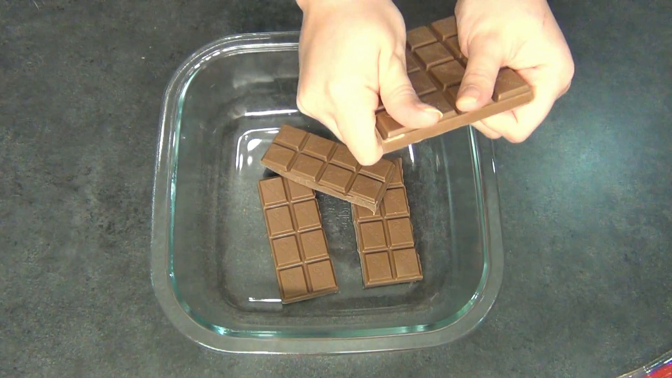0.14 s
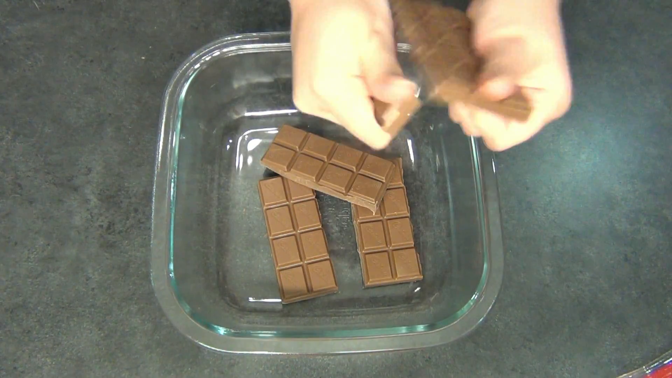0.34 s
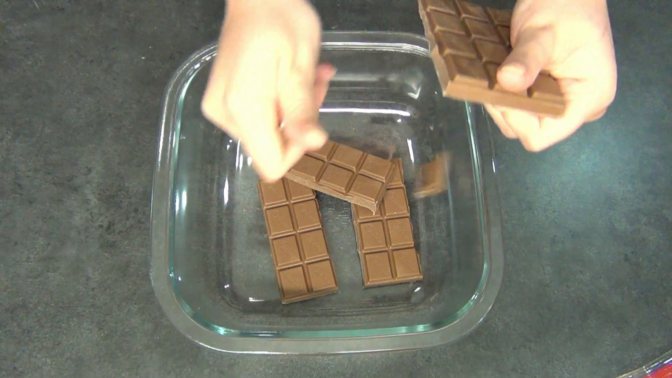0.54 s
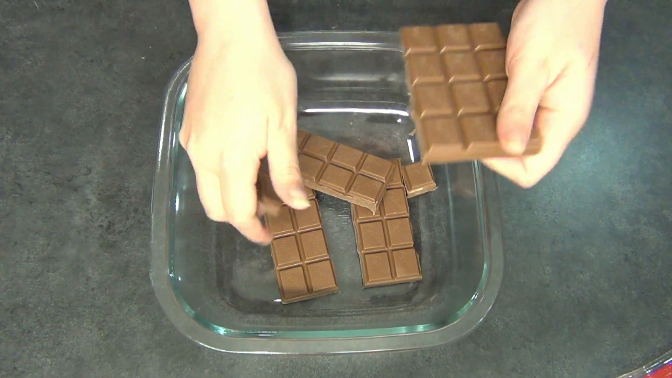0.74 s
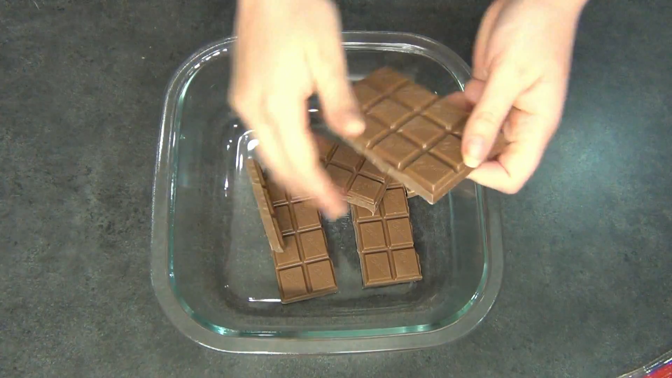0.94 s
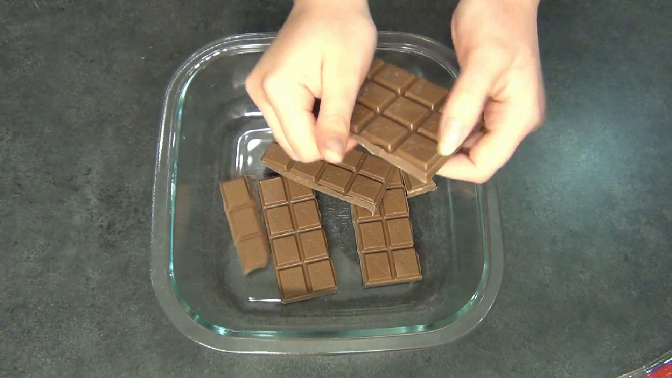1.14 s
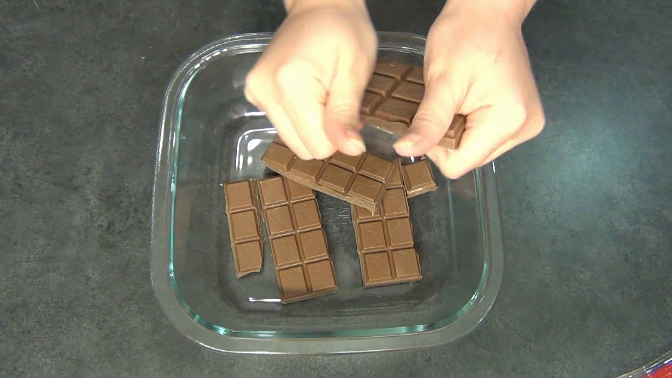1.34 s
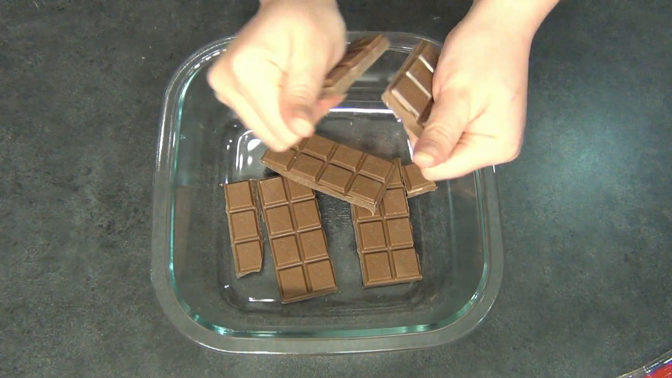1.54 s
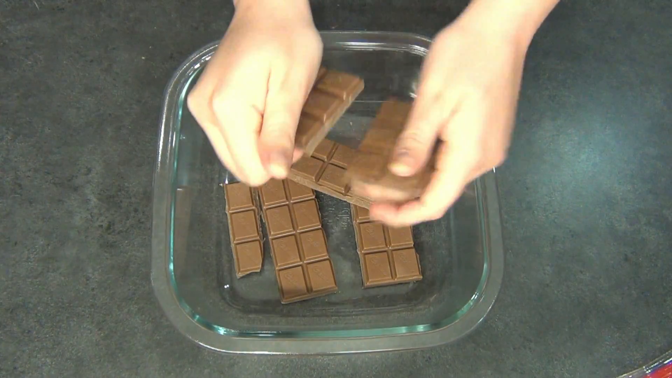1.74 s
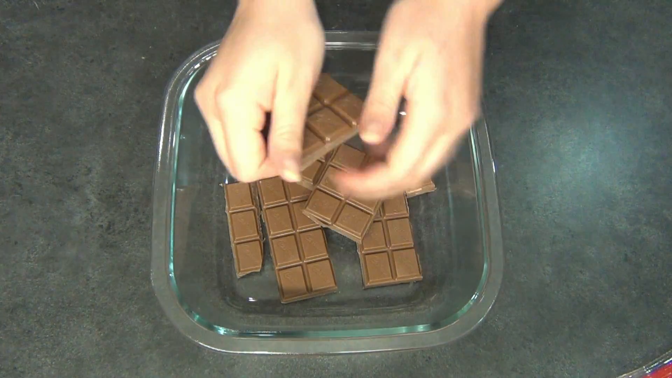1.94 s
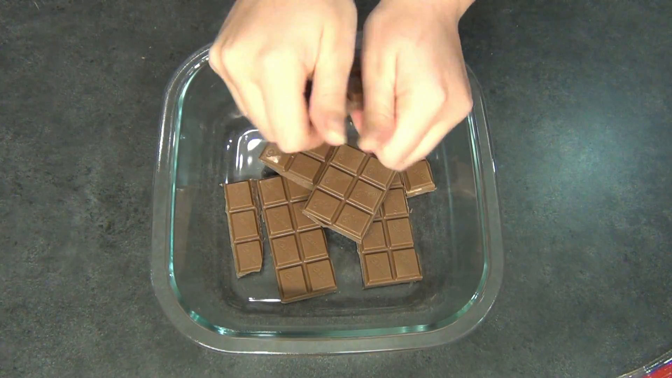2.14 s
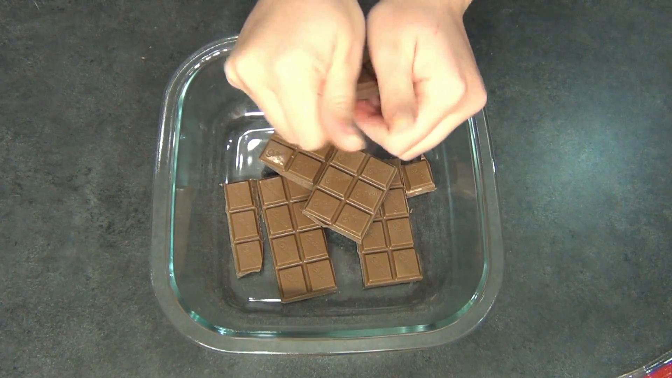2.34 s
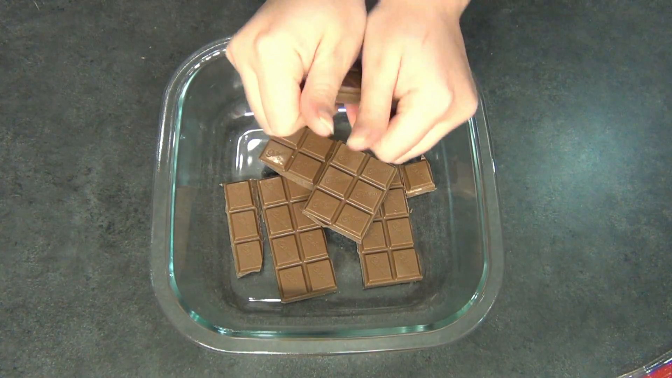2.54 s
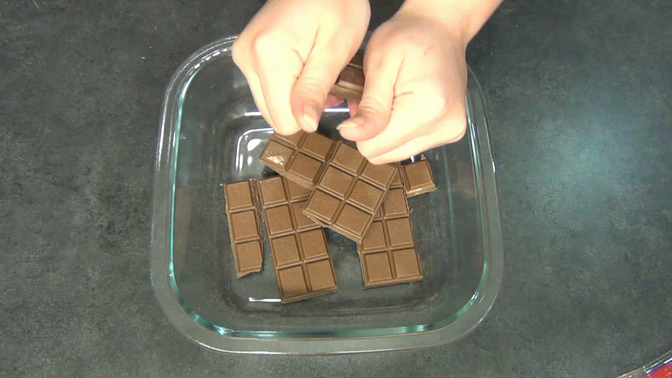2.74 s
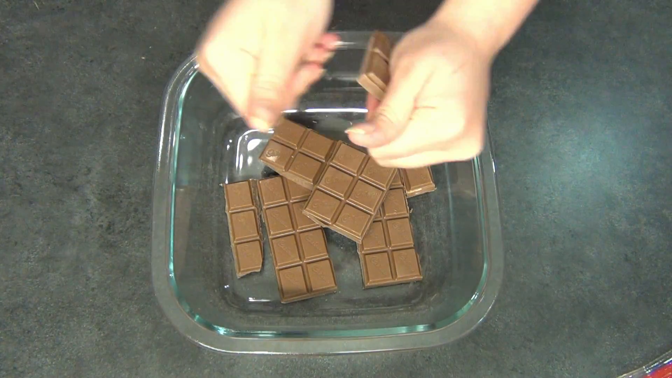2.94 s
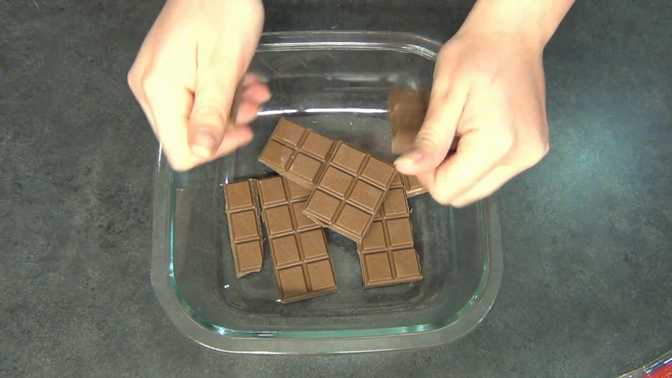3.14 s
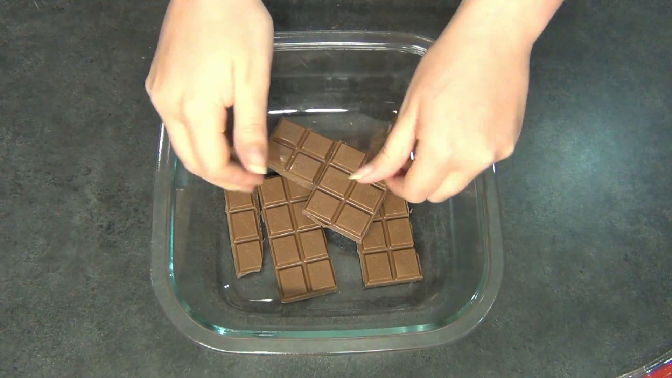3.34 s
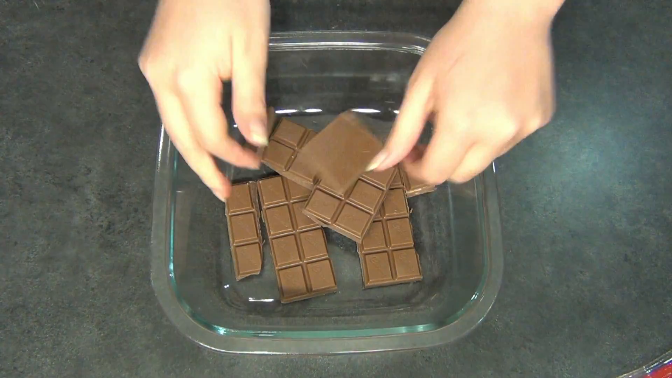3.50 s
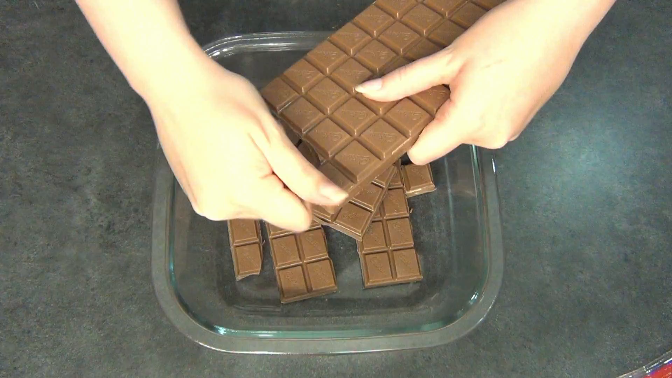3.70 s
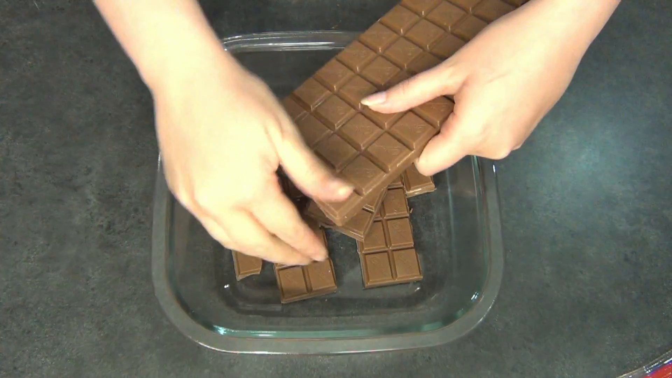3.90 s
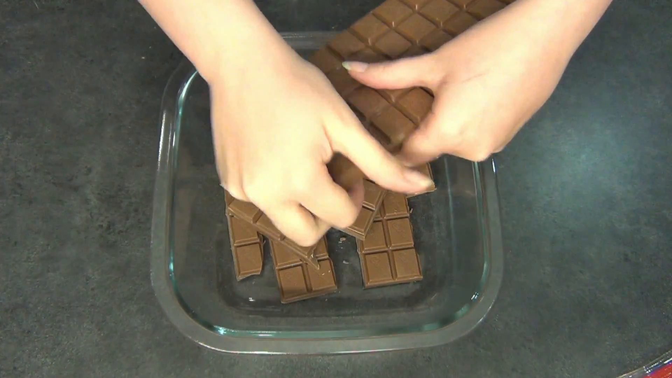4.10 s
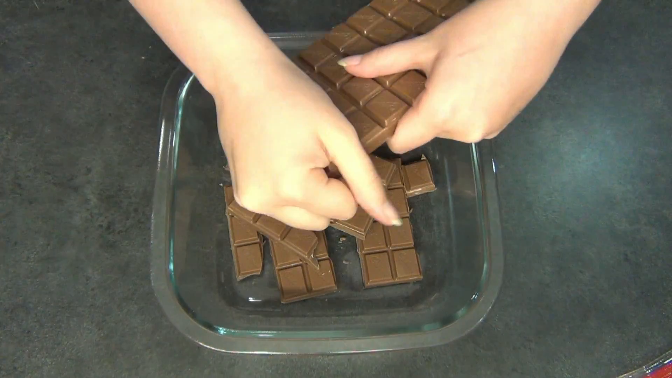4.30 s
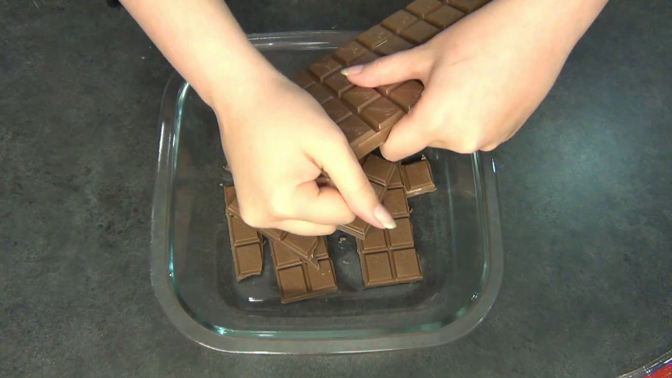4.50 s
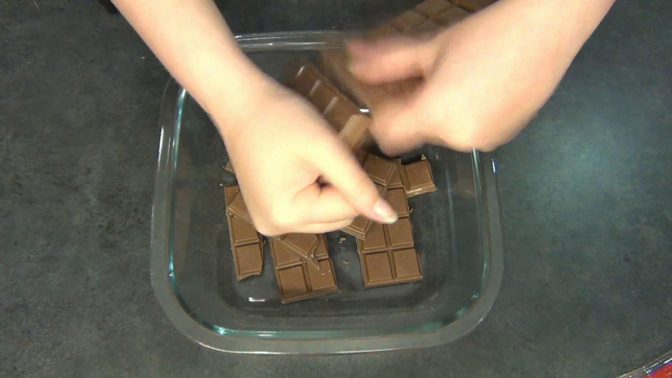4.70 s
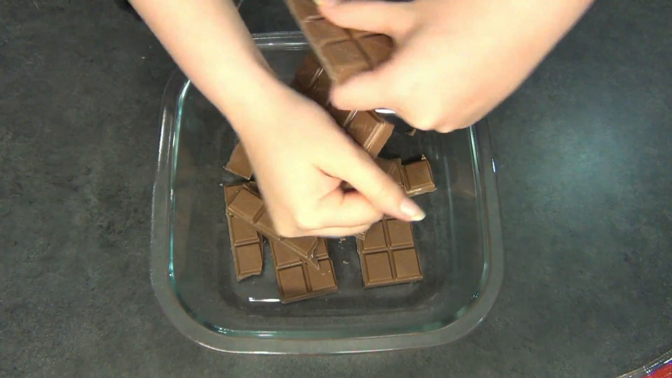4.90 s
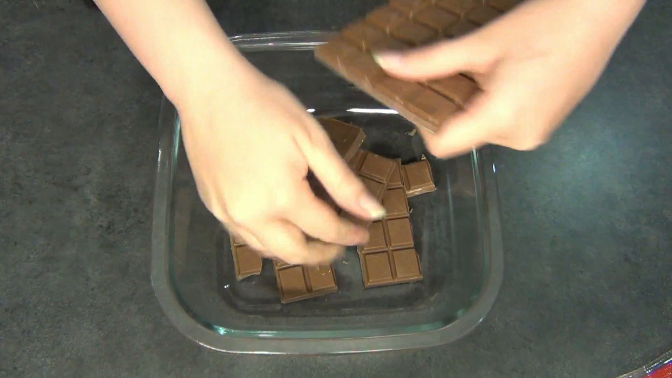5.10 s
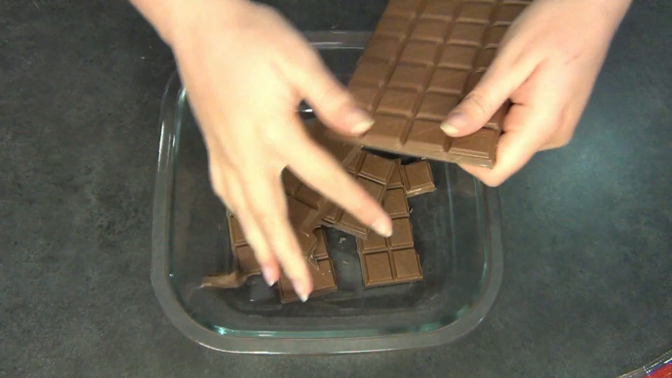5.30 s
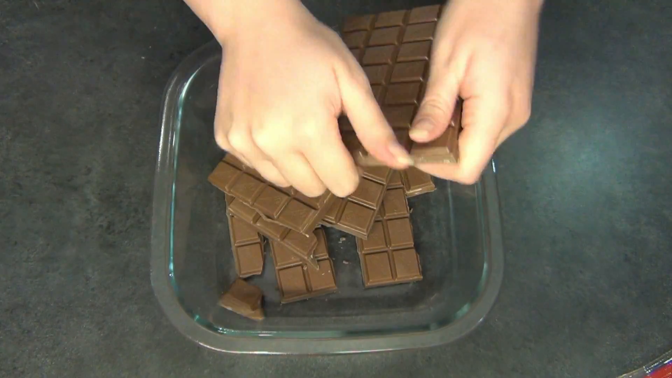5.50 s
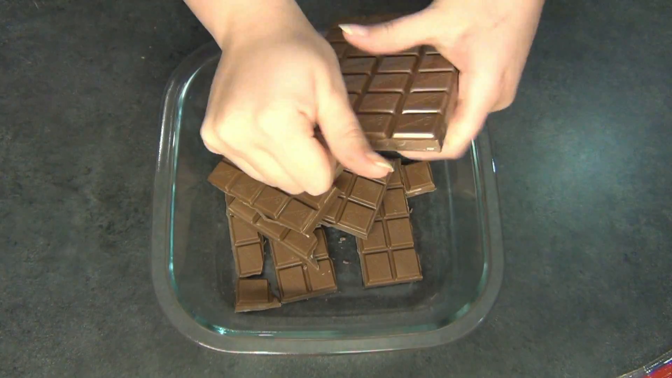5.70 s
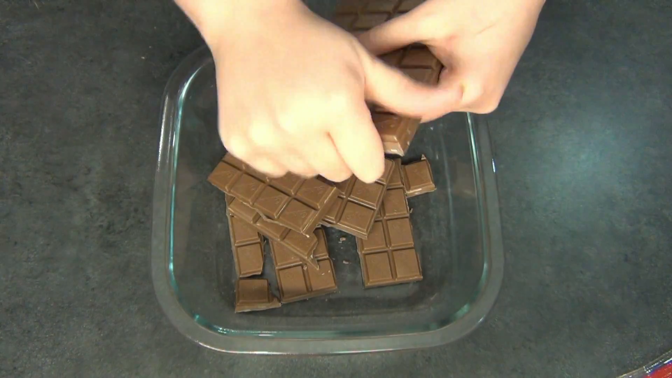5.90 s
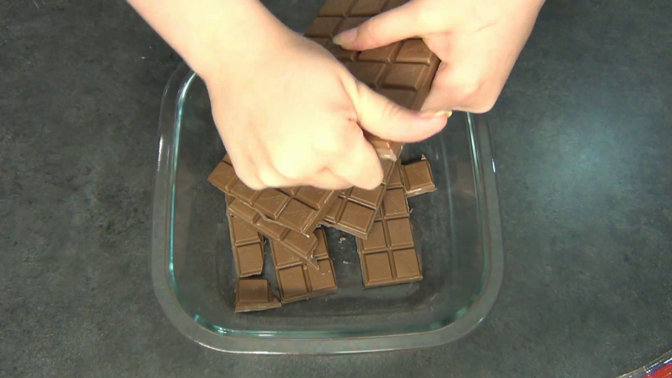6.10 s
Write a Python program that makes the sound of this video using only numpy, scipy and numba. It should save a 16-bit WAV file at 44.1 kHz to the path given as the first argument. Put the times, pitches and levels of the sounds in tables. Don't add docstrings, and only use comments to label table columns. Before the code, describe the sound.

Close above a glass dish on a kitchen counter, a chocolate bar is snapped by hand with loud, dry, irregular cracks. After most breaks the pieces drop in uneven flurries of clacks, with brief glassy rings and small counter thumps. Hard walls give a lively tail that swells after peaks flattened by the camera microphone. Soft finger rubs and faint hum and room tone lie beneath; one echo is cut off past the middle.

```python
import sys
import numpy as np
from scipy import signal
from scipy.fft import rfft, irfft
from scipy.io import wavfile
from scipy.ndimage import uniform_filter1d, minimum_filter1d
from numba import njit

SR = 44100
rng = np.random.default_rng(int(sys.argv[2]) if len(sys.argv) > 2 else 0)


def elevation(decibels):
    levels = np.asarray(decibels, float)
    return 10 ** (levels / 20)


def transcribe(signal):
    frames = np.atleast_2d(signal).T
    limited = np.clip(frames, -1, 1)
    pcm = np.round(limited * 32767).astype(np.int16)
    wavfile.write(sys.argv[1], SR, pcm)


N = 271215
CUT_S = 3.7595
GAP = 44100
LONG = N + GAP
SIDES = np.array([[1], [-1]])


def place(s):
    return int(s * SR) + GAP * (s > CUT_S)


def burst(rise_s, fall_s, body_hz, body_q, treble_db, edge_hz, low_hz):
    t = np.arange(1024) / SR
    f = np.fft.rfftfreq(1024, 1 / SR) + 1
    swell = (t / rise_s) ** 1.135 / (1 + (t / rise_s) ** 0.98)
    grit = rng.standard_normal(len(t)) * swell * np.exp(-t / fall_s)
    click = (t == 0) * np.linalg.norm(grit)
    body = 1 / (1 + (body_q * (f / body_hz - body_hz / f)) ** 2) ** 1.75
    edge = elevation(2 * treble_db) / (1 + (edge_hz / f) ** 2)
    power = (body + edge) / (1 + (low_hz / f) ** 4)
    cepstrum = irfft(np.log(power) / 2)
    forward = np.r_[1, np.full(511, 2.), 1, np.zeros(511)]
    colour = np.exp(rfft(cepstrum * forward))
    out = irfft(rfft([grit, click]) * colour)
    return out / np.abs(out[0]).max()


def snaps():
    # (time [s], peak [dB], bar resonance [Hz], sharpness Q [-], treble [dB])
    breaks = [
        (.39, 8.5, 1610, 2.7, -2),
        (0.4528, -13.5, 2880, 8.5, -14),
        (1.513, 1, 1055, 0.51, -2),
        (2.9419, -2.5, 2420, 2.2, -13.5),
        (4.413, 3.5, 1350, 1.4, 5.5),
        (4.7885, 8.5, 1320, 3.9, -6),
    ]
    out = np.zeros((2, LONG))
    for s, db, hz, q, treble_db in breaks:
        crack = burst(0.0017, 0.0011, hz, q, treble_db, edge_hz=1830, low_hz=0.22 * hz)
        out[:, place(s):][:, :1024] += elevation(db) * crack
    return out


def ring(modes, s, db, scatter_db, push, pitch_hz=None):
    spot = rng.standard_normal((len(s), len(modes)))
    starts = [place(t) for t in s]
    out = np.zeros(LONG)
    for k, (hz, mode_db, t60) in enumerate(modes):
        off_db = 0 if pitch_hz is None else -7 * np.abs(np.log2(hz / pitch_hz))
        blows = np.zeros(LONG)
        blows[starts] = elevation(db + mode_db + off_db + scatter_db * spot[:, k])
        pole = np.exp(2j * np.pi * hz / SR - np.log(1000) / (t60 * SR))
        out += signal.lfilter([1], [1, -pole], blows).imag
    contact = np.hanning(push)
    return np.convolve(out, contact / contact.sum())[:LONG]


def landings():
    # (time [s], peak [dB], contact pitch [Hz], counter thump [dB], sharpness [dB])
    corners = [(.6257, -1.5, 4500, -34, .1), (0.66, -10, 3950, -43, -11), (0.9106, -10, 4070, -22.5, -5),
               (1.2445, -2.5, 2740, -25.5, -8.5), (1.9129, -10.5, 4000, -23, -5),
               (1.937, 9.5, 4700, -16.5, 4), (1.9597, -0.5, 4580, -39, -12),
               (1.9618, -23, 3030, -25.5, -41), (3.5327, -21, 3000, -32, 5), (3.5516, -4, 3100, -38, -0.5),
               (3.607, -20.5, 5000, -40, 12), (3.608, -3.5, 5570, -25.5, -10),
               (3.6257, -13, 4100, -43, -12), (3.961, -15.5, 2830, -22, 5), (4.0319, -4, 3950, -25.5, 0),
               (5.212, -9, 2970, -16, -4), (5.2331, -9.5, 4000, -30, -11), (5.3752, -3.5, 4750, -23, 3)]
    # (time [s], peak [dB], contact pitch [Hz], counter thump [dB], hollowness [dB])
    faces = [(0.6174, -15, 2500, -54, -4.5), (0.8848, -16.5, 2850, -32.5, -3),
             (0.9042, -13, 3980, -34, 1.5), (0.915, 2, 2850, -24.5, -11.5), (1.0079, -3, 3450, -22.5, -15),
             (1.9085, -16.5, 3200, -20, 3.5), (1.9176, -10, 2960, -45, -26),
             (1.972, -6.5, 4160, -19.5, -10), (3.4698, -17, 2820, -20, -0.5), (3.505, -14, 2950, -30, -1),
             (3.5843, -20.5, 3030, -51, -3), (3.5909, -14, 2300, -33, -3),
             (3.6327, -11.5, 3100, -31.5, -3.5), (3.6494, -13.5, 2800, -26.5, -8),
             (3.9771, -14, 2950, -20, 0.5), (3.9937, -10.5, 4130, -59, -7), (5.1751, -15, 2920, -22, -9),
             (5.1903, -15.5, 3700, -33, 4), (5.3992, -15, 3900, -22.5, -0.5)]
    # (time [s], peak [dB], counter thump [dB])
    settles = [(0.6712, -34, -36), (0.8697, -38, -38), (1.0754, -29, -30.5), (1.1483, -41, -34),
               (1.2812, -22.5, -26), (3.4865, -36, -39), (3.5237, -36, -52), (3.7316, -22.5, -29),
               (5.4341, -22.5, -24.5), (5.4997, -32, -23.5), (5.5615, -35, -41.5)]
    # (treble [dB], hollow knock [dB], share of the peak dB that the knock follows [-])
    contacts = [
        (-12, -26, 0.83),
        (-46, -15, 0.79),
        (-27, -20.5, 0.9),
    ]
    settle_hz = 2950
    kinds = (
        [(*row, 0) for row in corners],
        [(*row[:4], 0, row[4]) for row in faces],
        [(s, db, settle_hz, thump_db, 0, 0) for s, db, thump_db in settles])
    out = []
    for rows, (treble_db, knock_db, follow) in zip(kinds, contacts):
        for s, db, hz, thump_db, sharp_db, hollow_db in rows:
            knock = knock_db + follow * db + hollow_db
            out.append((s, db, hz, thump_db, treble_db + sharp_db, knock))
    return np.transpose(out)


def drops():
    # (frequency [Hz], level [dB], t60 [s])
    floor_modes = [(2370, -7, .025), (2870, -2, .025), (3350, -6, .015), (3930, -3, .025), (4500, -7, .015),
                   (5050, -8, .015), (5750, -9, .015)]
    # (frequency [Hz], level [dB], t60 [s])
    hollow_modes = [(1550, -6.5, 0.035), (1575, -2, 0.044), (1620, -2, 0.034), (1798, -10, 0.071)]
    # (frequency [Hz], level [dB], t60 [s])
    counter_modes = [(96, -3, .35), (170, -6, .06), (197, -1, .05), (226, 0, .045), (265, -3, .04),
                     (320, -9, .04), (400, -8, .04), (485, -8, .05), (615, -6, .05), (760, -9, .03)]
    spot_db = 2.5
    s, db, pitch_hz, thump_db, treble_db, knock_db = landings()
    tick = np.zeros((2, LONG))
    for k in range(len(s)):
        hit = burst(0.00005, 0.0018, pitch_hz[k], 1.6, treble_db[k], edge_hz=1000, low_hz=1350)
        tick[:, place(s[k]):][:, :1024] += elevation(db[k] + 4.0) * hit
    clack = ring(floor_modes, s, db - 8.0, spot_db, push=5.7, pitch_hz=pitch_hz)
    knock = ring(hollow_modes, s, knock_db + 8.0, spot_db, push=10.4)
    thump = ring(counter_modes, s, thump_db + 3.5, spot_db, push=68.0)
    return tick + clack + knock, thump


def glass():
    # (time [s], ring [dB], long-wall tone [dB], thin-rim tones [dB], favoured pitch [Hz])
    clinks = [(0.6201, -35, -42, -52, 2000), (.6265, -15, -21, -35.5, 4240), (.657, -44, -61, -46, 3950),
              (0.905, -19, -43, -41, 2940), (0.915, -25, -43, -32, 3180), (1.008, -30.5, -48, -43, 3330),
              (1.245, -29.5, -42.5, -36, 2950), (1.907, -37, -57, -36, 1600), (1.964, -36, -48, -46, 4400),
              (3.505, -33.5, -57, -52, 2900), (3.633, -31.5, -39.5, -49, 2300),
              (3.96, -46, -44, -44.5, 2000), (4.032, -33.5, -40.5, -30.5, 3600),
              (5.191, -37, -36.5, -59, 1600), (5.211, -39, -44, -36.5, 2940),
              (5.374, -39.5, -32.5, -25, 2980), (5.433, -46, -36, -46, 2870), (5.5, -65, -34.5, -70, 2810)]
    # (frequency [Hz], level [dB], t60 [s])
    body_modes = [(1525, -7, .15), (1585, -8, .2), (2366, -6, .25), (2835, -6, .15), (2865, -3, .6),
                  (3010, -13, .2), (3905, -5, .15), (3942, -7, .25), (3970, -3, .2), (4505, -9, .25),
                  (5050, -5, .3), (5435, -7, .22), (5690, -9, .18), (6150, -13, .2)]
    # (frequency [Hz], level [dB], t60 [s])
    rim_modes = [(6621, -3, .15), (7515, -4, .15), (8285, -5, .15), (8700, 0, .14), (9800, -3, .15),
                 (10350, -3, .14), (11050, -6, .12), (11850, -3, .13)]
    # (frequency [Hz], level [dB], t60 [s])
    wall_modes = [(839.5, 0, .5)]
    spot_db = 1.5
    s, ring_db, wall_db, rim_db, pitch_hz = np.transpose(clinks)
    body = ring(body_modes, s, ring_db, spot_db, push=3.1, pitch_hz=pitch_hz)
    flash_modes = [(hz, db, 0.13 * t60) for hz, db, t60 in body_modes[2:] + rim_modes[:5]]
    flash = ring(flash_modes, s, rim_db + 13.5, 2 * spot_db, push=3)
    wall = ring(wall_modes, s, wall_db, 0, push=14.0) * elevation([[0], [-1.5]])
    rim = ring(rim_modes, s, rim_db - 5, spot_db, push=3)
    return body + flash + wall + rim


def rubs():
    # (time [s], peak [dB], length [s], centre [Hz])
    slides = [(.0, -39.5, 0.24, 1430), (0.158, -53, 0.036, 9000), (1.02, -37, 0.003, 10500),
              (1.071, -38, 0.0018, 11000), (1.11, -44, 0.0022, 9000), (1.151, -39, 0.0018, 12000),
              (1.225, -42, 0.0022, 10000), (2.164, -34, 0.0026, 11000), (2.539, -53, 0.018, 9200),
              (2.624, -51.5, 0.088, 13000), (3.947, -46, .004, 7000), (4.211, -42.5, 0.017, 9850),
              (5.0, -55, 0.016, 5200), (5.785, -47.5, 0.038, 11100), (5.88, -49.5, .035, 9250),
              (6, -61, .012, 7860), (6.038, -45, 0.029, 8750)]
    out = np.zeros(N)
    t = np.arange(N) / SR
    for s, db, length, hz in slides:
        near = slice(max(int((s - length) * SR), 0), int((s + length) * SR))
        noise = rng.standard_normal(len(t[near]))
        swish = signal.lfilter(*signal.iirpeak(hz, 1.4, fs=SR), noise)
        out[near] += elevation(db) * swish * np.exp(-((t[near] - s) / (length / 1.65)) ** 2)
    return out


def read_curve(rows, hz):
    f, *cols = np.transpose(rows)
    return [np.interp(np.log(hz + 1), np.log(f), c) for c in cols]


def kitchen(x):
    # (frequency [Hz], t60 [s], level [dB])
    decay = [(106, 0.8, -7), (234, 0.51, 17.5), (635, 0.9, 7.5), (1730, 0.82, 4.5), (4570, 0.77, 0),
             (13800, 0.45, -0.5)]
    wet_db, wet_side_db = -10.5, -11
    t = np.arange(GAP) / SR
    f = np.fft.rfftfreq(GAP, 1 / SR)
    noise = rfft(rng.standard_normal((2, GAP)))
    tail = 0
    for hz in 50 * 2 ** (np.arange(26) / 3):
        t60, db = read_curve(decay, hz)
        band = np.cos(np.clip(np.log2((f + 1) / hz) * 3, -1, 1) * np.pi / 2) ** 2
        tail = tail + elevation(db) * irfft(noise * band, GAP) * elevation(-60 * t / t60)
    tail = tail * np.clip((t - .004) / 0.0028, 0, 1)
    tail = tail / np.sqrt(np.sum(tail[0] ** 2))
    mid, side = signal.fftconvolve(x[None], tail, axes=1)[:, :LONG]
    return elevation(wet_db) * (mid + SIDES * elevation(wet_side_db) * side)


def air():
    # (frequency [Hz], density [dB per Hz])
    hiss = [(25, -19.5), (150, -4.5), (210, -6.5), (496, -5.5), (927, -14), (2300, -24.5), (15200, -28),
            (16500, -27)]
    # (frequency [Hz], side minus mid [dB])
    spread = [(60, -27), (110, -48), (200, -24), (500, -20), (1290, -3.5), (4400, -6), (8120, -6),
              (15000, -11)]
    # (frequency [Hz], level [dB rms])
    hum_tones = [(99.5, -66.5), (199.2, -61)]
    f = np.fft.rfftfreq(N, 1 / SR)
    t = np.arange(N) / SR
    mid, side = irfft(rfft(rng.standard_normal((2, N))) * elevation(read_curve(hiss, f)[0]), N)
    side = irfft(rfft(side) * elevation(read_curve(spread, f)[0]), N)
    hum = sum(elevation(db) * np.sqrt(2) * np.sin(2 * np.pi * hz * t) for hz, db in hum_tones)
    return elevation(-52) / mid.std() * (mid + SIDES * side) + hum


def scene():
    dish, thump = drops()
    thump = thump * elevation([[0], [-2]])
    near, spread = snaps() + dish + thump + glass()
    port = elevation(-17.5) * np.roll(np.diff(near, prepend=0), 5)
    sound = near + SIDES * port + kitchen(spread)
    bass = signal.lfilter(*signal.butter(1, 425, fs=SR), sound)
    sound = sound + SIDES * 0.13 * bass
    cut = int(CUT_S * SR)
    sound = np.delete(sound, np.s_[cut:cut + GAP], axis=1)
    capsule = signal.butter(4, [151.6, 13000], "band", fs=SR, output="sos")
    top = signal.ellip(8, .5, 30, 15900, fs=SR, output="sos")
    return signal.sosfilt(top, signal.sosfilt(capsule, sound) + rubs() + air())


@njit
def recover(gain, step):
    out, g = np.empty(len(gain)), 1.
    for i in range(len(gain)):
        g = min(gain[i], g + (1 - g) * step)
        out[i] = g
    return out


def band_limit(x):
    return signal.sosfilt(signal.butter(12, 17010, fs=SR, output="sos"), x)


def record(dry):
    ceiling_db, release_s = -6, 0.012
    need = np.minimum(1, elevation(ceiling_db) / (np.abs(dry).max(axis=0) + 1e-9))
    held = minimum_filter1d(need, size=24)
    gain = uniform_filter1d(recover(held, 1 / (release_s * SR)), size=48)
    mix = 0.84 * np.tanh(dry * gain / 0.76)
    return band_limit(mix)


dry = scene()
out = record(dry)
transcribe(out)
```